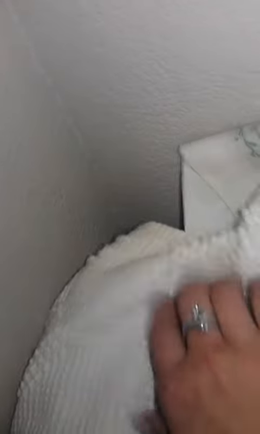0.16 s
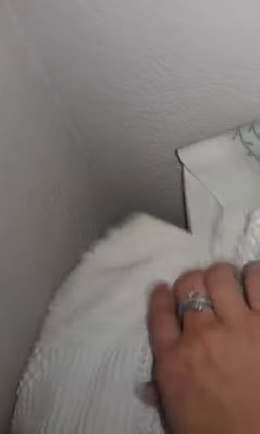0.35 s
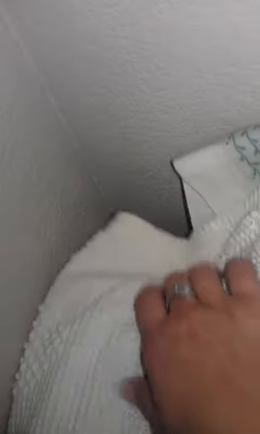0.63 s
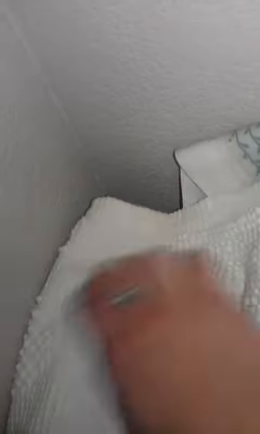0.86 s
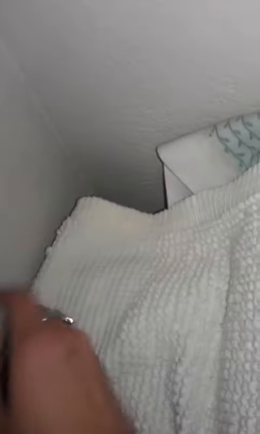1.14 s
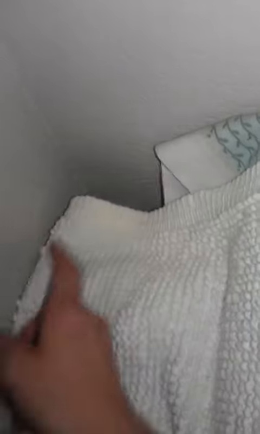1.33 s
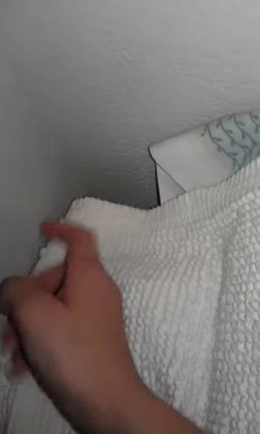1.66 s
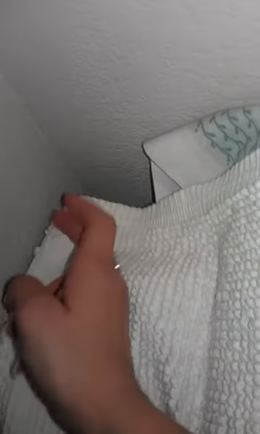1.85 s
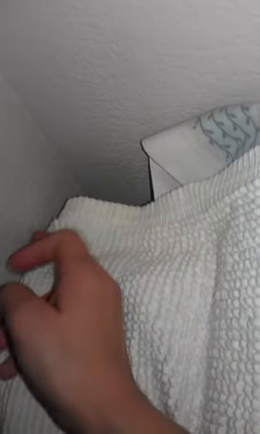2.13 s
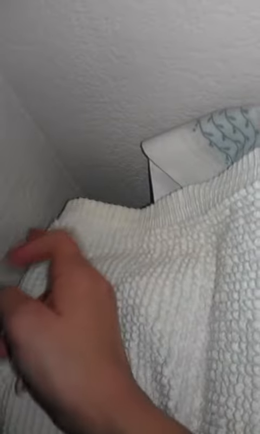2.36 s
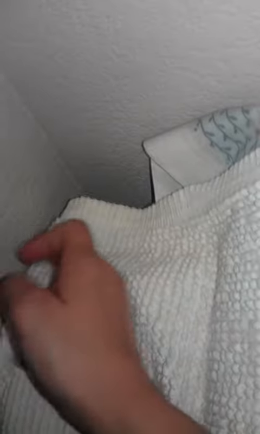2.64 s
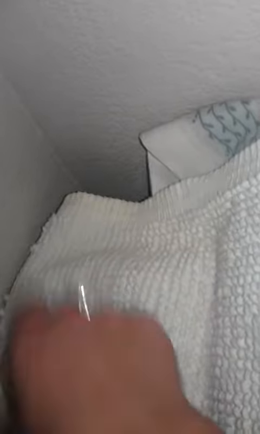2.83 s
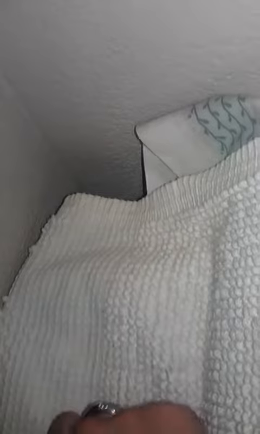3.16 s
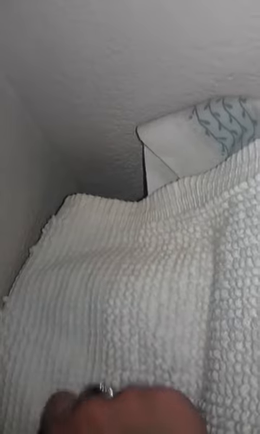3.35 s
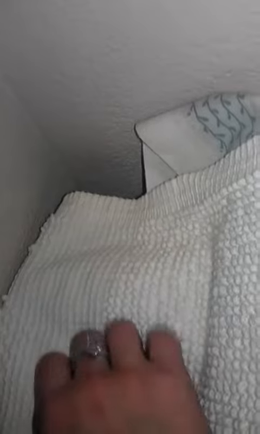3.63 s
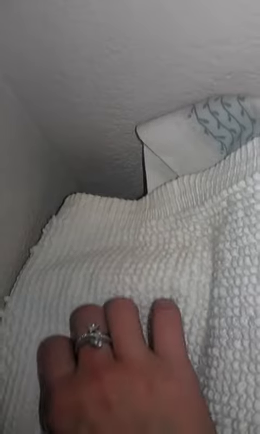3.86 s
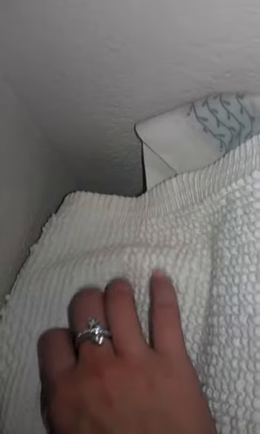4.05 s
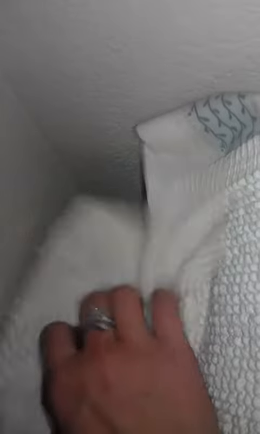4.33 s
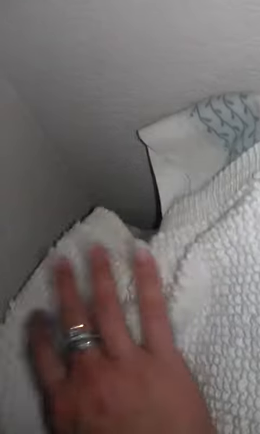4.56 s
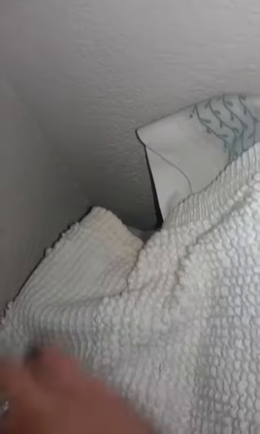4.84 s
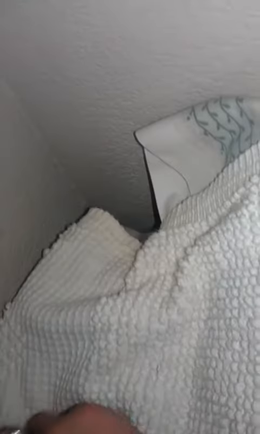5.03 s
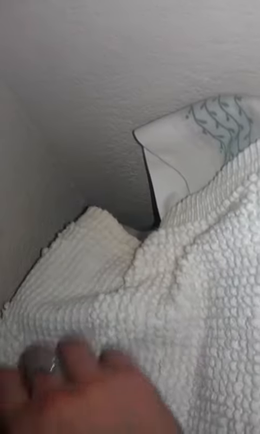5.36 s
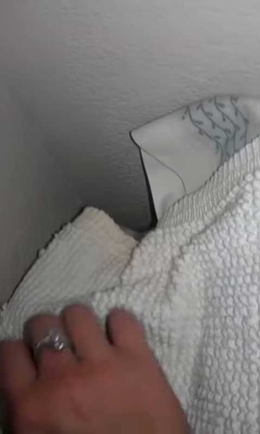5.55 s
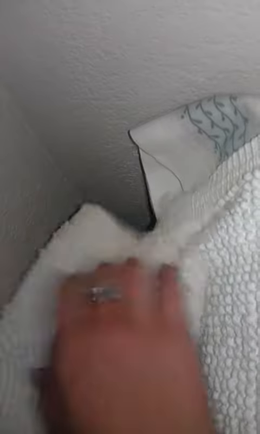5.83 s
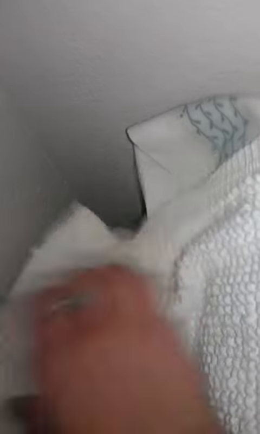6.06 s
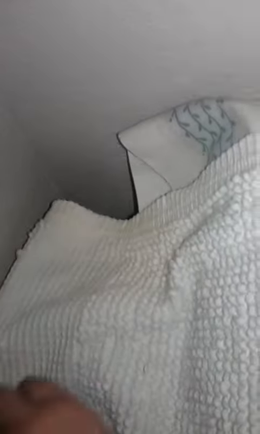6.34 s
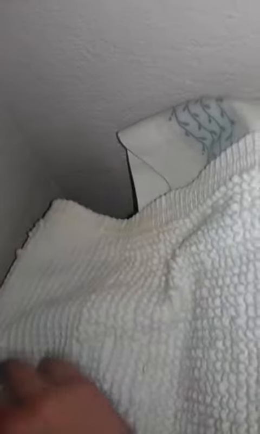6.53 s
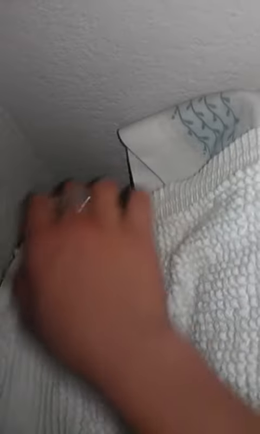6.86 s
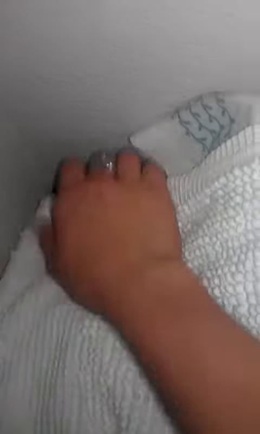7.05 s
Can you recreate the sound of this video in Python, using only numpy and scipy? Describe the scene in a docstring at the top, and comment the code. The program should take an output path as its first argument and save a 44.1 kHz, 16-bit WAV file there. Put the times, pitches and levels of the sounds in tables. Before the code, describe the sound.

Soft rubbing and muffled pats on nubby bedding open the scene, with a stronger rustling push after a second. Light ticks lead to a run of sharp, bright fingernail clicks, by far the loudest events. Afterwards slow strokes alternate with quick scratchy swipes, dull padded thumps and isolated ring or nail ticks. Close mono microphone, small room, short faint tail, low air noise.

```python
"""A hand strokes a nubby cotton blanket close to the microphone in a small, quiet bedroom with a faint hum.
First come soft thuds of fingertips and even slides, sliding grains of hiss, then harder pushes at one second.
Light decaying rings tick before the nails snap, about two to two and a half seconds in, as compact clicks
over a thumping finger. Strokes, ticks, rustles and thuds then alternate, up to a last brisk slide.
Delayed copies and a noise tail answer from the nearby walls. The sound is mono."""
import sys
import numpy as np
from scipy import signal
from scipy.fft import rfft, irfft
from scipy.io import wavfile

SR = 44100
rng = np.random.default_rng(int(sys.argv[2]) if len(sys.argv) > 2 else 0)


def dump_mix(stems):
    """Bounce the given channels to the path in sys.argv[1] as a 16-bit WAV at rate SR."""
    frames = np.atleast_2d(stems).T  # one column per channel
    limited = np.clip(frames, -1, 1)  # hard clip at full scale
    pcm = np.round(limited * 32767).astype(np.int16)
    wavfile.write(sys.argv[1], SR, pcm)


N = 317520  # 7.2 s


def from_db(db):
    """Decibels to gain."""
    return 10 ** (np.asarray(db) / 20)


def rms_one(x):
    """Scale to unit rms."""
    return x / np.sqrt(np.mean(x ** 2) + 1e-20)


def cut(x, hz, kind, order=2):
    """Butterworth low- or high-pass."""
    sos = signal.butter(order, min(hz, .45 * SR), kind, fs=SR, output="sos")
    return signal.sosfilt(sos, x)


def spectrum_gain(spectrum, size):
    """Gain at each FFT bin, in dB straight lines over log frequency between the given points."""
    hz, db = np.transpose(spectrum)
    log_f = np.log(np.maximum(np.fft.rfftfreq(size, 1 / SR), 1))
    return from_db(np.interp(log_f, np.log(hz), db))


def coloured(x, spectrum):
    """Give a flat excitation a smooth spectrum; rms 1."""
    return rms_one(irfft(rfft(x) * spectrum_gain(spectrum, len(x)), len(x)))


def drift(rate):
    """Slow random wander with spread 1, low-passed at the rate in Hz."""
    wander = cut(rng.standard_normal(N + SR), rate, "low")
    return rms_one(wander[SR:])  # drop the filter's first second


def grains(per_s, spread_db):
    """Random little slips of uneven size and either sign; rms 1 overall, even when the rate varies."""
    sizes = from_db(spread_db * np.minimum(rng.exponential(1, N), 4))
    signed = sizes * rng.choice([-1, 1], N)
    slipping = rng.random(N) < per_s / SR
    return rms_one(signed * slipping / np.sqrt(per_s))


def ring(hz, t60):
    """A struck mode: a sine dying by 60 dB in t60 seconds, cut off after a tenth of a second."""
    t = np.arange(SR // 10) / SR
    return np.sin(2 * np.pi * hz * t) * from_db(-60 * t / t60)


def swell(peak, length):
    """A bell-shaped rise and fall of height 1, at half height for the given length in seconds."""
    t = np.arange(N) / SR
    return .5 ** np.minimum((2 * (t - peak) / length) ** 2, 40)


def add(track, s, sound):
    """Mix a sound into the track at time s."""
    i = int(s * SR)
    track[i:i + len(sound)] += sound[:N - i]


def still_room(air_db=-60):
    """Even air and microphone hiss with a low hum and thin whines whose phase wavers."""
    # Still room and microphone hiss. Each row: frequency in Hz, relative density in dB per Hz.
    air = [(20, -9), (55, 7), (100, 6), (190, 0.5), (450, 0), (700, -3.5), (1300, -3.5), (2600, -7),
           (5000, -9), (6500, -7), (7900, -3.5), (10000, -13.5), (16000, -15)]
    # Hum and faint whines. Each row: pitch in Hz, rms level in dB, rate of the phase wander in Hz.
    hum_tones = [(119.1, -74, 4.1), (979, -81.5, 12.4), (1532, -80.5, 7.4), (7880, -79, 57)]
    t = np.arange(N) / SR
    hum = np.zeros(N)
    for hz, db, width in hum_tones:
        hum += from_db(db) * rms_one(np.cos(2 * np.pi * hz * t + drift(width)))
    return hum + from_db(air_db) * coloured(rng.standard_normal(N), air)


def bedroom(x, t60=0.35, tail_db=-25, gap_s=0.025):
    """A few distinct wall echoes, then a short diffuse tail; the bedding keeps the bass dry."""
    # Nearby walls. Each row: delay in seconds, gain in dB.
    walls = [(.0082, -20), (0.026, -32), (0.0284, -32)]
    t = np.arange(SR // 2) / SR
    tail = rng.standard_normal(len(t)) * from_db(-60 * t / t60) * (t > gap_s)
    response = from_db(tail_db) * tail / np.sqrt(np.sum(tail ** 2))
    for delay, db in walls:
        response[int(delay * SR)] += from_db(db)
    wet = signal.fftconvolve(x, response)[:N]
    return cut(wet, 180, "high", order=1)


def thuds(cycles=2.95, lift_db=5):
    """The padded bed swallows a fingertip's blow within a few cycles."""
    # Fingertips dropping off a nub or patting the bed.
    # Each row: start in seconds, level in dB before the common lift and filters, pitch in Hz.
    blows = [(.004, -48, 149), (0.036, -42.5, 378), (.070, -47, 160), (0.096, -45, 232), (.126, -49, 260),
             (0.164, -42, 300), (.207, -42, 140), (.222, -45, 150), (0.243, -49, 90), (.251, -49, 260),
             (.320, -47, 325), (.442, -44, 96), (.444, -50, 240), (.497, -46, 210), (.503, -53, 55),
             (0.59, -43.5, 219), (.622, -51, 230), (.636, -51, 60), (.671, -46, 130), (.683, -50, 383),
             (0.799, -42, 240), (.835, -45, 130), (0.843, -48, 330), (1.055, -39, 330), (1.072, -37, 320),
             (1.088, -42, 190), (1.115, -41, 300), (1.151, -44, 130), (1.7631, -40.5, 430),
             (1.767, -46.5, 400), (2.291, -46, 85), (3.69, -46, 238), (3.874, -42.5, 214),
             (3.921, -46, 124), (4.010, -42, 200), (4.035, -36, 245), (4.062, -43, 200), (4.117, -43, 170),
             (4.18, -46, 245), (4.394, -37, 500), (4.444, -35.5, 450), (4.536, -40, 510),
             (4.684, -43.5, 453), (4.756, -39, 480), (5.872, -40.5, 105), (5.897, -41, 380),
             (5.992, -45, 300), (5.999, -37, 330), (6.004, -37, 121), (6.076, -43, 450), (6.081, -46, 380),
             (6.648, -47.5, 350), (7.061, -43.5, 480), (7.156, -38.5, 230)]
    out = np.zeros(N)
    for s, db, hz in blows:
        blow = cut(ring(hz, cycles / hz), hz * 3, "low")
        blow = cut(blow, hz * 0.5, "high", order=1)
        add(out, s, from_db(db + lift_db) * blow)
    return out


def rustles():
    """Brief clusters of tiny slips, each in its own range of pitch."""
    # Small rustles of a fold or of a nail skidding over threads.
    # Each row: peak in seconds, length at half strength in seconds, level in dB, low and high edge in Hz.
    clusters = [(1.1, 0.22, -61, 700, 4500), (1.771, 0.021, -50.5, 2000, 3600),
                (3.88, 0.022, -60, 900, 2500), (4.505, 0.057, -60, 3500, 4600),
                (4.555, .025, -60, 700, 2200), (5.06, 0.065, -67, 890, 2500),
                (5.74, 0.014, -59, 1500, 2700), (5.836, 0.02, -57, 7000, 15000),
                (6.639, 0.014, -59, 2800, 8450)]
    slips = grains(per_s=1300, spread_db=3.0)
    out = np.zeros(N)
    for peak, length, db, low, high in clusters:
        band = cut(cut(slips, low, "high"), high, "low")
        out += from_db(db) * swell(peak, length) * rms_one(band)
    return out


def ticks():
    """Each light touch of nail or ring is one short cluster of modes with a rough scrape inside it."""
    # Light ticks of nail and finger ring. Each row: start in seconds, level in dB before the filters,
    # ring pitch in Hz, t60 in seconds, scrape in dB relative to the ring, low and high edge in Hz.
    touches = [(1.7623, -26, 7570, 0.013, -17, 4300, 12500), (1.7648, -25, 7800, .006, -10, 3800, 12500),
               (1.7667, -29, 7550, 0.006, -12, 4500, 12500), (1.7694, -32, 7500, .009, -15, 4200, 12500),
               (1.7716, -32, 7700, .009, -15, 4200, 12500), (3.298, -15.5, 7700, 0.0032, -27, 5000, 12500),
               (3.2995, -16, 8150, 0.0041, -26, 5500, 12500), (4.5366, -30.5, 1700, 0.0035, -15, 600, 2450),
               (4.545, -38, 1150, 0.006, -12, 550, 2300), (4.6847, -39.5, 2100, 0.0051, -2, 600, 4800),
               (5.205, -51, 1690, .005, -5, 796, 3500), (5.347, -41.5, 2390, 0.034, -3.5, 950, 3200),
               (5.3495, -38, 7100, 0.0061, -5, 3000, 8800), (5.5820, -21.5, 8800, 0.0014, -8, 7300, 13000),
               (5.726, -37, 8260, .004, -8, 5800, 12500), (5.7321, -38.5, 7500, 0.0041, -4, 5000, 11000),
               (6.649, -38.5, 1460, 0.013, -10, 1050, 2600), (6.6486, -49, 3020, 0.0092, -1, 2100, 4400),
               (7.0606, -19, 7900, 0.0039, -21, 4600, 11500), (7.0608, -30.5, 4450, .005, -18, 1200, 6000),
               (7.063, -31, 7800, .004, -7, 3500, 9300), (7.1565, -31, 7400, 0.0057, -19, 4460, 9500),
               (7.174, -34, 7500, .004, -8, 3700, 9500)]
    # Close modes that beat. Each row: multiple of the ring pitch, level in dB relative to the tick.
    tick_modes = [(.91, -8.5), (1, -0.5), (1.1, -9.5)]
    t = np.arange(SR // 10) / SR
    out = np.zeros(N)
    for s, db, hz, t60, scrape_db, low, high in touches:
        tone = np.zeros(len(t))
        for k, (ratio, mode_db) in enumerate(tick_modes):
            tone += (-1) ** (k // 2) * from_db(mode_db) * ring(hz * ratio, t60)
        noise_gain = np.sqrt(SR / 2 / hz)  # stronger under a low ring
        scrape = rng.standard_normal(len(t)) * noise_gain * from_db(-60 * t / t60)
        tick = cut(tone + from_db(scrape_db) * scrape, high, "low", order=4)
        add(out, s, from_db(db) * cut(tick, low, "high", order=3))
    return out


def click(spectrum, size=4096):
    """The most compact click with this spectrum: it starts at once and rings out (minimum phase)."""
    cepstrum = irfft(np.log(spectrum_gain(spectrum, size)))
    causal_fold = 1 + np.sign(np.fft.fftfreq(size))
    return irfft(np.exp(rfft(cepstrum * causal_fold)))


def scatter(t60, build_s, lumpy_db=0.5):
    """Reflections of a crack build up and die away, a little unevenly."""
    # A crack spreading sideways into the room. Each row: frequency in Hz, relative density in dB per Hz.
    crack = [(150, -9), (300, 4.5), (600, -8), (1100, -18), (2000, -14), (2450, 3), (3300, 1), (4400, -1.5),
             (5500, -7), (8000, -0.5), (9300, -11), (11000, -14), (16000, -34)]
    t = np.arange(SR // 3) / SR
    fade = from_db(-60 * t / t60)
    clumps = from_db(lumpy_db * rms_one(cut(rng.standard_normal(len(t)), 270, "low")))
    return fade * np.minimum(t / build_s, 1) * coloured(clumps * rng.standard_normal(len(t)), crack)


def snapped_nail(soft_hz, near_db=-37.5, near_t60=0.033, lag_hz=7800, lag_width_hz=3000):
    """The broad, dense crack of a nail letting go, hollowed by antiresonances of nail and fingertip."""
    # Crack of the nail. Each row: frequency in Hz, level in dB before each snap's own variation.
    nail_spectrum = [(300, -19), (1200, -28.5), (2000, -21.5), (2600, -9.5), (3350, 4.3), (4300, -12.3),
                     (5200, 1), (6200, -3), (7300, 2.5), (8300, 1.5), (9600, -3.5), (10700, -20),
                     (13000, -18), (16000, -39)]
    # Antiresonances, alike on every snap. Each row: frequency in Hz, width in Hz.
    hollows = [(2150, 290), (2870, 560), (3950, 140), (4760, 110), (6120, 230), (7800, 210), (9100, 200)]
    varied = [(hz, db + rng.normal(0, 1.0)) for hz, db in nail_spectrum]
    nail = cut(click(varied), soft_hz, "low", order=4)
    # reflections off the hand and bed corner
    nail = nail + from_db(near_db) * scatter(near_t60, build_s=0.00069)[:len(nail)]
    for hz, width in hollows:
        nail = signal.lfilter(*signal.iirnotch(hz, hz / width, fs=SR), nail)
    # all-pass: the brightest part takes a few cycles to build
    notched = signal.lfilter(*signal.iirnotch(lag_hz, lag_hz / lag_width_hz, fs=SR), nail)
    return 2 * notched - nail


def finger_thump(hz, level_db):
    """The finger behind the nail is struck and sounds in a few decaying modes."""
    # Finger modes. Each row: multiple of the thump's pitch, dB relative to the thump, t60 in seconds.
    finger_modes = [(1, -11, 0.021), (1.66, -24.5, 0.0071), (2.5, -35, 0.028), (3.7, -35, 0.03)]
    thump = np.zeros(SR // 10)
    for k, (ratio, db, t60) in enumerate(finger_modes):
        thump += (-1) ** k * from_db(db + level_db) * ring(ratio * hz, t60)
    return cut(thump, 0.8 * hz, "high", order=3)


def snaps(corner_s=.014, corner_db=-54, corner_t60=0.13, far_db=-55.0, far_t60=0.29,
          echo_s=.027, echo_db=-42.5, echo_hz=7200, echo_t60=.018):
    """A nail catches and lets go: it cracks while the finger behind it thumps."""
    # Nail snaps. Each row: start in seconds, level in dB, thump of the finger in dB relative,
    # pitch of the thump in Hz, contact softness as a low-pass in Hz.
    nail_snaps = [(2.0360, 8.3, -18.5, 301, 9900), (2.0384, -2, -40, 303, 8440),
                  (2.2997, -7, -24, 265, 7250), (2.3880, 1.6, -26, 292, 11300),
                  (2.517, 2.5, -30, 250, 12500), (2.6177, 5.5, -27.5, 256, 17000)]
    out = np.zeros(N)
    for s, level_db, finger_db, finger_hz, soft_hz in nail_snaps:
        add(out, s, from_db(level_db) * snapped_nail(soft_hz))
        add(out, s, from_db(level_db) * finger_thump(finger_hz, finger_db))
        # off the corner of the walls
        corner = scatter(corner_t60, build_s=0.0024, lumpy_db=6.5)
        add(out, s + corner_s, from_db(level_db + corner_db) * corner)
        # off the whole room
        add(out, s, from_db(level_db + far_db) * scatter(far_t60, build_s=0.0023))
        # the brightest ring comes back off the far wall
        add(out, s + echo_s, from_db(level_db + echo_db) * ring(echo_hz, echo_t60))
    return out


def strokes(attack_s=0.081, release_s=0.099):
    """Strength of hiss and drag in dB: slides start, hold and stop, pushes swell, and their powers add."""
    # The flat hand slides at an even pace.
    # Each row: start and end in seconds, hiss in dB, drag on the nubs in dB before the common lift.
    slides = [(0, 0.896, -58, -71), (1.7, 1.825, -62, -81), (2.712, 3.165, -59.5, -72.5),
              (3.35, 4.19, -60, -76), (4.437, 4.538, -53, -70), (4.68, 4.82, -59, -69),
              (5.36, 6.213, -67.5, -80), (6.747, 7.2, -52.5, -67.5)]
    # The fingers give a push that swells and fades. Each row: peak in seconds,
    # length at half strength in seconds, hiss in dB, drag on the nubs in dB before the common lift.
    pushes = [(.215, 0.069, -56.5, -62), (.33, 0.042, -54, -67.5), (.51, 0.18, -59, -71.5),
              (.675, 0.063, -54, -75), (.82, 0.19, -64, -76), (1.083, 0.12, -53.5, -53),
              (1.11, 0.23, -51.5, -65.5), (1.235, 0.13, -55, -68), (1.435, 0.14, -55, -74),
              (1.53, 0.13, -56.5, -68), (3.9, 0.064, -60, -71), (4.08, 0.22, -70, -63.5),
              (4.424, 0.065, -43, -51.5), (4.738, 0.06, -47, -53.5), (5.892, 0.055, -55, -57.5),
              (6.01, 0.054, -54, -58.5), (6.101, 0.063, -55.5, -61), (6.26, 0.058, -59, -76.5),
              (6.765, 0.1, -75, -58), (7.185, 0.069, -50.5, -55)]
    t = np.arange(N) / SR
    power = np.full((2, N), 1e-10)
    for start, end, *db in slides:
        # the hand gets going before the start and slows down after the end
        corners = [start - attack_s, start, end, end + release_s]
        pace = np.interp(t, corners, [0, 1, 1, 0]) ** 2
        power += np.outer(from_db(db), pace) ** 2
    for peak, length, *db in pushes:
        power += np.outer(from_db(db), swell(peak, length)) ** 2
    return 10 * np.log10(power)


def snags(per_s=45, spread_db=1.0, cycles=7.2):
    """Coarse, irregular crackle of yarn loops that catch and let go; rms 1."""
    # Loops of yarn, each snapping back at its own pitch. Each row: pitch in Hz, relative level in dB.
    loops = [(650, 3), (950, -4), (1350, -7), (1900, 0), (2700, -8), (3700, 4), (4400, 7), (6000, 4)]
    crackle = np.zeros(N)
    for hz, db in loops:
        plucked = signal.fftconvolve(grains(per_s, spread_db), ring(hz, cycles / hz))[:N]
        crackle += from_db(db) * rms_one(plucked)
    return rms_one(crackle)


def rubbing(fast_db=-48, fast_range_db=3, fast_low_hz=230, unsteady_db=.5, thread_db=-9.5,
            gentle_loss=0.12, gentle_hz=4000, snag_db=-9.0, drag_lift_db=2.0):
    """Fibre slips hiss, single threads prickle, and nubs bump dully, more often under harder drag."""
    # Fibres sliding under the skin. Each row: frequency in Hz, relative density in dB per Hz.
    fibre_spectrum = [(600, -12), (1100, -12), (1700, -11.5), (2600, -12), (4000, -11.8), (5000, -11.5),
                      (6300, -7), (7700, -1.5), (8900, -7), (10200, -15.3), (12500, -25.5), (16000, -31)]
    # Single threads plucked by the nails. Each row: frequency in Hz, relative density in dB per Hz.
    thread_spectrum = [(1000, -19), (4000, -15), (7800, -3), (10500, -17), (16000, -18)]
    # The cloth dragged over the mattress. Each row: frequency in Hz, relative density in dB per Hz.
    drag_spectrum = [(35, 0), (70, -1.5), (130, 1), (250, -1), (420, 0), (650, -9.5), (1000, -17.5),
                     (2500, -32.5)]
    # the pressure of the hand wavers
    hiss_db, drag_db = strokes() + unsteady_db * drift(rate=8.4)
    weave = drift(rate=63)  # the bumpy weave shakes both together
    fibres = coloured(grains(per_s=7000, spread_db=-1.5), fibre_spectrum)
    threads = coloured(grains(per_s=350, spread_db=1.5), thread_spectrum)
    fibres = fibres + from_db(thread_db) * threads
    nubs_per_s = 200 * from_db(0.88 * (drag_db + 63.5))
    nubs = coloured(grains(nubs_per_s, spread_db=2.0), drag_spectrum)
    # 0 for a gentle stroke, 1 for a quick swipe, judged by the strength of the hiss
    fast = .5 + .5 * np.tanh((hiss_db - fast_db) / fast_range_db)
    # a quick swipe skims the nubs and loses depth
    nubs = nubs - fast * cut(nubs, fast_low_hz, "low", order=1)
    # a gentle stroke sounds thinner
    fibres = fibres - gentle_loss * (1 - fast) * cut(fibres, gentle_hz, "low", order=1)
    # a quick swipe tears at the loops
    fibres = fibres + fast * from_db(snag_db) * snags()
    hiss = fibres * from_db(hiss_db + 0.9 * weave)
    bumps = nubs * from_db(drag_db + drag_lift_db + 2.7 * weave)
    return hiss + bumps


def scene():
    """The hand on the blanket in its room, alike in both channels."""
    hand = rubbing() + snaps() + ticks() + rustles() + thuds()
    mono = hand + bedroom(hand) + still_room()
    return np.stack([mono, mono])


def record(dry, cutoff_hz=15900):
    """The microphone sheds the deepest rumble and the top is cut steeply."""
    steep_top = signal.ellip(10, .1, 70, cutoff_hz, fs=SR, output="sos")
    return signal.sosfilt(steep_top, cut(dry, 35, "high"))


dry = scene()
out = record(dry)
dump_mix(out)
```